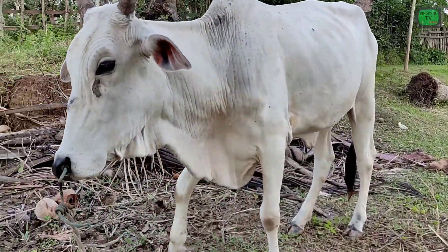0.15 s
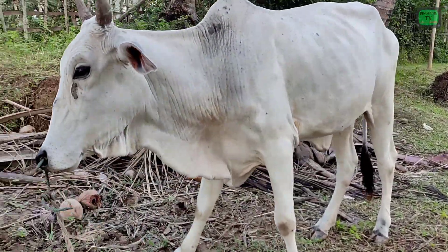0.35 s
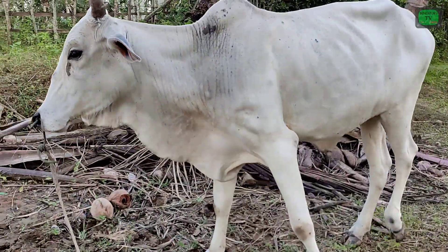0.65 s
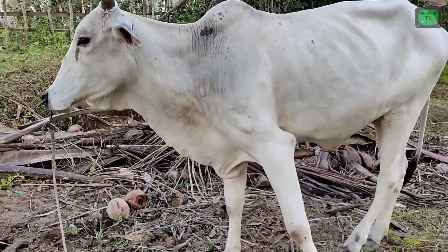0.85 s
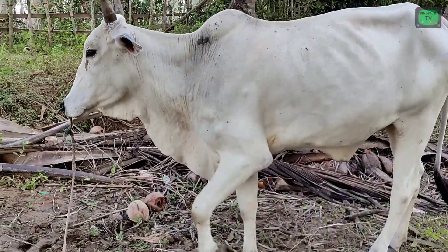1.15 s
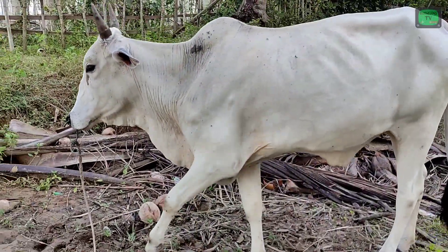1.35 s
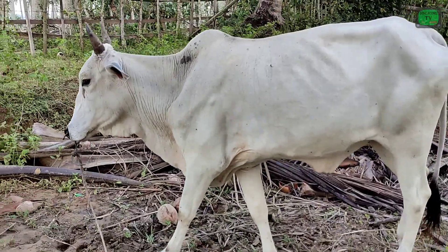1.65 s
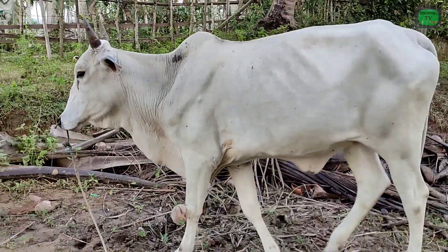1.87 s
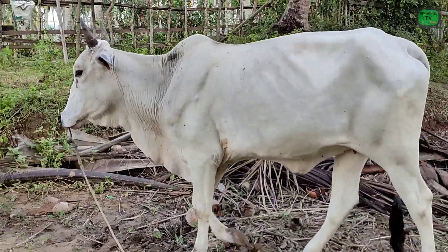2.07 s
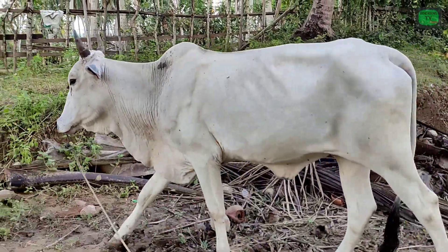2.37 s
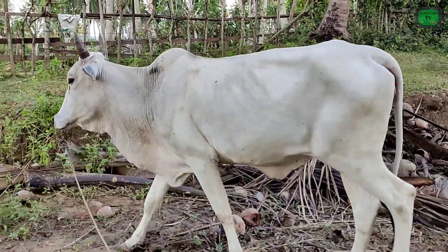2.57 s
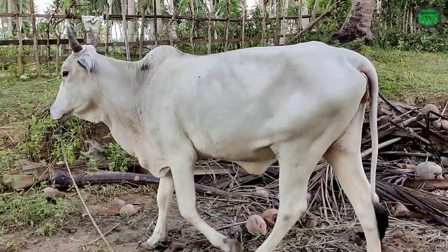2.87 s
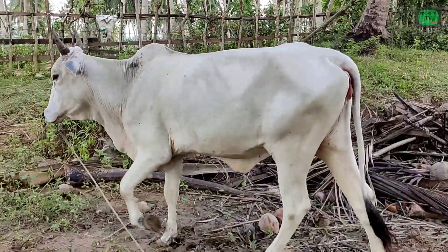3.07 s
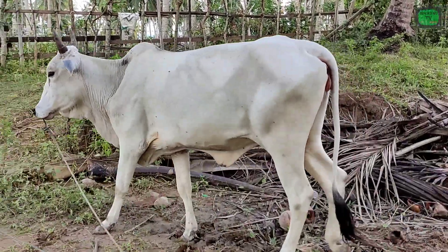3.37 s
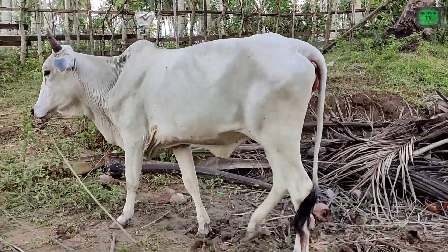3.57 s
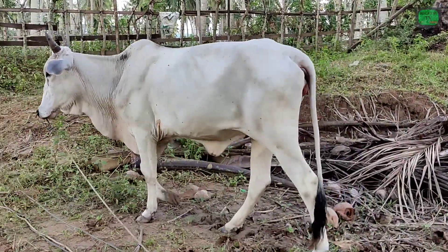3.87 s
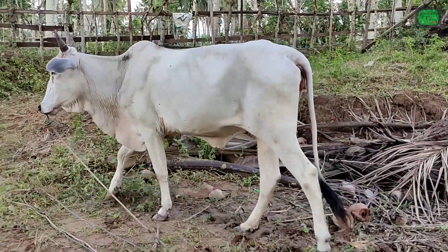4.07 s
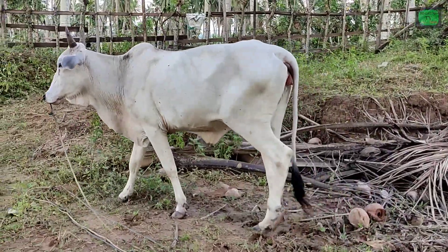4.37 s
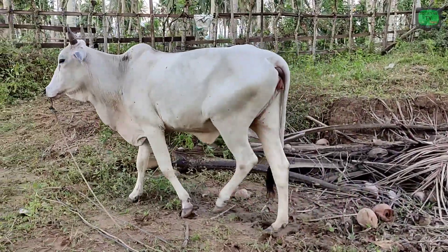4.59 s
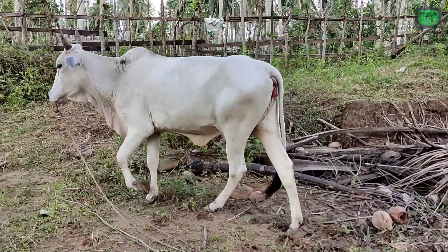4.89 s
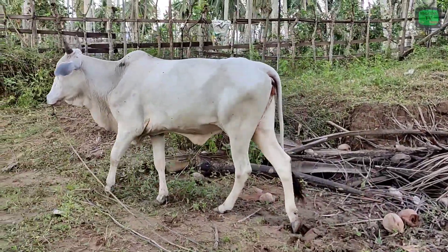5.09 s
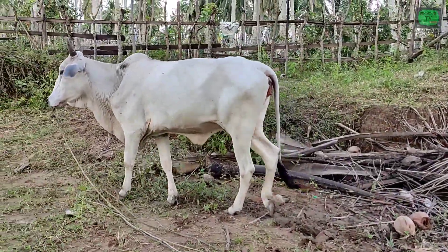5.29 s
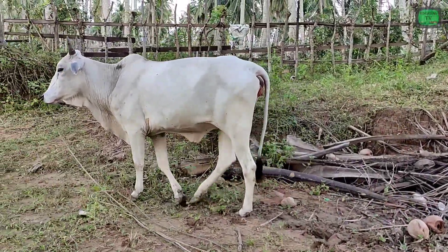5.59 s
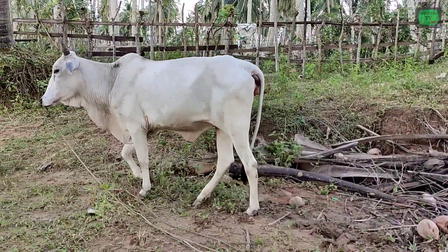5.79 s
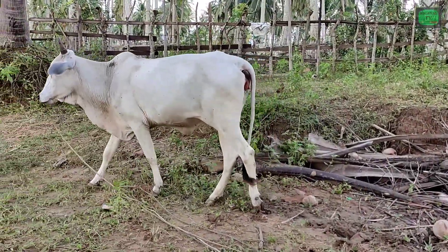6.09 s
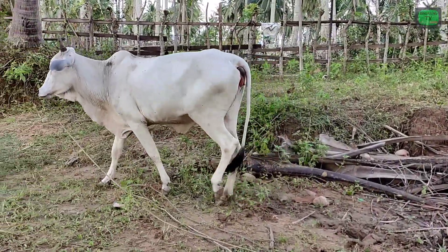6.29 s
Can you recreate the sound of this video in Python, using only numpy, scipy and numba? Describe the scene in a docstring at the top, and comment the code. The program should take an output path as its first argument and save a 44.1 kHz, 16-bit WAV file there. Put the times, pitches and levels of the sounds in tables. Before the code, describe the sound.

In a still farmyard one cow calls twice. The first moo starts slack and rattly, rises gradually to a steady bray with airy hiss, and drops quickly at the end. Small dry twigs crackle in the gap. The second moo has the same shape but is higher, stronger and more piercing, its held tone hitching slightly several times. The microphone is close, with a short diffuse outdoor tail, and the treble leans left.

```python
"""Moos in a farmyard

One moo of a cow is heard twice, the second time raised in pitch and resonances, and louder. Pulses and
turbulence from the vocal folds ring the resonances of the airway. Each moo starts behind closed lips,
opens from a slack, snapping rasp into a clear tone with a hiss on top and slackens again; a toneless
noisy tail fades after it. The held tone of the second skips by part of a cycle several times.
Fence and trees scatter the sound as dense echoes. Shaped noise makes the quiet air, and resonant
bursts of noise the few ticking twigs."""
import sys
import numpy as np
from scipy import signal
from scipy.fft import rfft, irfft, next_fast_len
from scipy.io import wavfile
from scipy.ndimage import uniform_filter1d
from numba import njit

SR = 44100
rng = np.random.default_rng(int(sys.argv[2]) if len(sys.argv) > 2 else 0)


def log_audio(samples):
    """Write samples as a 16-bit WAV file to the path given in sys.argv[1]."""
    # one column per channel
    frames = np.atleast_2d(samples).T
    # limit to full scale, then quantise
    limited = np.clip(frames, -1, 1)
    pcm = np.round(limited * 32767).astype(np.int16)
    wavfile.write(sys.argv[1], SR, pcm)


N = 283987
TIME = np.arange(N) / SR


def from_db(db):
    """Decibels express the logarithm of an amplitude ratio; this gives the ratio."""
    return 10 ** (np.asarray(db) / 20)


def rms_one(x):
    """Normalization: the root mean square becomes 1."""
    return x / np.sqrt(np.mean(x ** 2) + 1e-20)


def in_time(rows, t):
    """Linear interpolation of the columns of a curve at times t."""
    s, *columns = np.transpose(rows)
    return [np.interp(t, s, c) for c in columns]


def at_hz(points, hz):
    """Interpolation of a spectrum on a logarithmic frequency axis."""
    f, value = np.transpose(points)
    return np.interp(np.log(hz + 1), np.log(f), value)


def butter(x, hz, kind, order=2):
    """Causal filtering with a maximally flat (Butterworth) passband."""
    sections = signal.butter(order, np.minimum(hz, .45 * SR), kind, fs=SR, output="sos")
    return signal.sosfilt(sections, x + 1e-18)


@njit
def two_pole(drive, pull, damping):
    """Second-order feedback: a resonance whose tuning may change from sample to sample."""
    y = drive.copy()
    for i in range(2, len(y)):
        y[i] += pull[i] * y[i - 1] - damping * y[i - 2]
    return y


def resonate(x, hz, width_hz):
    """Resonance with a moving centre, passed twice for steep flanks; the gain at the peak is 1."""
    r = np.exp(-np.pi * width_hz / SR)
    pull = 2 * r * np.cos(2 * np.pi * hz / SR) * np.ones(len(x))
    for _ in range(2):
        two_back = np.pad(x, (2, 0))[:-2]
        x = two_pole((1 - r * r) / 2 * (x - two_back), pull, r * r)
    return x


def evened(x, size=1300):
    """Level control: dividing by the short-time rms holds it at 1."""
    power = uniform_filter1d(uniform_filter1d(x * x, size), size)
    return x / np.sqrt(np.maximum(power, 0) + 1e-14)


def delayed(x, s):
    """Pure delay: the same sound s seconds later."""
    at = np.arange(len(x))
    return np.interp(at - s * SR, at, x, left=0)


def drift(cutoff_hz, size):
    """Low-passed noise wanders at random; its spread is 1."""
    return rms_one(butter(rng.standard_normal(size + SR), cutoff_hz, "low")[SR:])


# spectrum of the background air, relative: frequency_hz, level_db (per Hz)
AIR_SPECTRUM = [(15, -73), (25, -65), (49, -8.5), (119, -9.5), (221, -11), (378, -17), (482, -24.5),
                (582, -18.5), (631, -24), (1450, -29), (2630, -33), (3630, -28), (5880, -40.5), (9050, -32),
                (15500, -52.5)]
# correlation between left and right in the air: frequency_hz, likeness (no unit)
AIR_LIKENESS = [(60, 0.96), (130, 0.91), (290, 0.69), (640, 0.16), (1410, -0.062), (3100, -0.047),
                (6820, -0.03), (15000, -0.03)]
AIR_DB = -68.5


def air():
    """Diffuse field: shaped noise, alike on both sides only in the bass."""
    hz = np.arange(N // 2 + 1) * SR / N
    mid, side = rfft(rng.standard_normal((2, N)))
    alike = np.clip(at_hz(AIR_LIKENESS, hz), -.9, .99)
    side = np.sqrt((1 - alike) / (1 + alike)) * side * [[1], [-1]]
    both = irfft(from_db(at_hz(AIR_SPECTRUM, hz)) * (mid + side), N)
    return from_db(AIR_DB) * both / np.std(both.mean(axis=0))


# twigs and dry leaves: start_s, peak_db, ring_hz, t60_s (decay by 60 dB of the burst)
TWIGS = [(0.309, -67, 900, .02), (3.80, -59, 9000, 0.34), (3.808, -60, 1390, 0.13),
         (3.892, -53, 950, 0.015), (4.044, -49.5, 720, 0.015), (4.127, -54, 1300, 0.012),
         (4.265, -57, 3540, 0.019), (4.28, -51, 3640, 0.0077)]


def twigs(width_hz=2600):
    """Damped excitation: a decaying noise burst in a broad resonance gives a short crack or rustle."""
    out, t = np.zeros((2, N)), TIME[:SR // 4]
    for start_s, peak_db, ring_hz, t60_s in TWIGS:
        bursts = rng.standard_normal((2, len(t))) * from_db(-60 * t / t60_s)
        crack = np.array([resonate(burst, ring_hz, width_hz) for burst in bursts])
        at = round(start_s * SR)
        out[:, at:at + len(t)] += from_db(peak_db) * crack / np.abs(crack).max()
    return out


def echoes(x, t60, turns_per_s):
    """Dense reflections differ on each side and glide between two patterns as the animal moves."""
    t = TIME[TIME < min(t60, 1)]
    patterns = rng.standard_normal((2, 2, SR))[..., :len(t)] * from_db(-60 * t / t60)
    patterns /= np.sqrt(np.sum(patterns * patterns, axis=2, keepdims=True))
    angle = 2 * np.pi * turns_per_s * TIME
    shares = np.cos(angle), np.sin(angle)   # constant power
    return sum(share * signal.oaconvolve(x, paths, axes=1)[:, :N]
               for share, paths in zip(shares, patterns))


# shading of the right side, strongest in the treble: frequency_hz, left_minus_right_db
SHADE = [(100, 3), (380, 3), (720, 4.5), (1000, 1), (1350, 4), (2400, 12), (4400, 1.5), (6500, 11),
         (8500, 15), (15000, 17.5)]
LEFT_SCATTER_HZ, RIGHT_SCATTER_HZ = 3400, 1300   # each side is scattered above this
SCATTER_T60_S, SCATTER_DB = .028, 2.5
TAIL_T60_S, TAIL_DB, TAIL_HZ = .24, -5, [1200, 8000]
DIRECT_HZ, RIGHT_LAG_S = 4500, .0001


def yard(x, snap):
    """Direct and scattered sound: vowel and snaps arrive straight, left first; treble is scattered.

    More is scattered on the shaded right; a short tail beats with gliding partials."""
    direct = butter(x, DIRECT_HZ, "low", order=1) + snap
    both = np.array([direct, delayed(direct, RIGHT_LAG_S)])
    treble = np.array([butter(x, hz, "high", order=3) for hz in (LEFT_SCATTER_HZ, RIGHT_SCATTER_HZ)])
    both += from_db(SCATTER_DB) * echoes(treble, t60=SCATTER_T60_S, turns_per_s=0.3078)
    tail = butter(x, TAIL_HZ, "band", order=2)[None]
    both += from_db(TAIL_DB) * echoes(tail, t60=TAIL_T60_S, turns_per_s=.1)
    size = next_fast_len(N + SR // 8, True)
    hz = np.arange(size // 2 + 1) * SR / size
    sides = from_db(at_hz(SHADE, hz) * np.array([[.5], [-.5]]))
    sides /= np.sqrt(np.mean(sides ** 2, axis=0))
    return irfft(rfft(both, size) * sides, size)[:, :N]


RELEASE_AT_S = 2.634   # age at which the voice starts to die away
MOO_END_S = 3.36   # end of the tail on the clock of the first moo
END_FADE_S = 0.015   # length of the short fade that ends the tail; the tail also enters in this time
TAIL_NOISE_HZ, TAIL_NOISE_DB, TAIL_NOISE_FADE_DB_PER_S = (250, 2800), -55.5, 56   # before the call's gain


def tail_noise(age):
    """Exponential decay: a toneless, noisy tail fades after the tone drops."""
    since = age - RELEASE_AT_S
    fade = from_db(TAIL_NOISE_DB - TAIL_NOISE_FADE_DB_PER_S * np.maximum(since, 0))
    level = np.clip(since / END_FADE_S, 0, 1) * fade
    return level * rms_one(butter(rng.standard_normal(len(age)), TAIL_NOISE_HZ, "band", order=1))


# unevenness of the folds, each as (taut, slack)
WAVER = (.001, .0045)   # spread of the beat rate, as a fraction
JITTER_S = (.000005, .00003)
SHIMMER_DB, LIMP_DB = 1.5, .8   # fully slack: spread of the pulse strength, and its strong-weak swing


def folds(pitch, slack):
    """Self-oscillation: each snap shut gives a pulse and a puff; slack folds beat unevenly, strong-weak."""
    n = len(pitch)
    waver = np.interp(slack, [0, 1], WAVER) * drift(29.6, size=n)
    cycles = np.cumsum(pitch * (1 + waver)) / SR
    at = np.interp(np.arange(int(cycles[-1])), cycles, np.arange(n))
    loose = slack[at.astype(int)]
    chance = rng.standard_normal((len(at), 2))
    at = np.clip(at + SR * np.interp(loose, [0, 1], JITTER_S) * chance[:, 0], 0, n - 2)
    limp = LIMP_DB * (-1) ** np.arange(len(at))
    strength = from_db(loose * (SHIMMER_DB * chance[:, 1] + limp))
    # each pulse is shared between two samples, so it may fall between them
    whole, part = at.astype(int), at % 1
    pulses = np.bincount(whole, strength * (1 - part), n) + np.bincount(whole + 1, strength * part, n)
    puffs = rng.standard_normal(n) * np.exp(np.cos(2 * np.pi * cycles))
    return rms_one(pulses), rms_one(puffs)


# the nasal cavity as a side branch that swallows some partials: centre_hz, width_hz (before the ratio)
ANTIRESONANCES = [(905, 120), (1760, 12)]


def side_branch(x, ratio):
    """Antiresonance: a side branch cuts a notch at each of its own frequencies."""
    for hz, width_hz in ANTIRESONANCES:
        x = signal.lfilter(*signal.iirnotch(hz * ratio, hz / width_hz, fs=SR), x)
    return x


# level of each part of the voice before the gain of the call:
# part: base_db, slack_extra_db, wide_mouth_extra_db, closed_lips_extra_db, trend_db_per_s
LEVELS = {"nose": (-33, -2, -5, -4, -0.12), "mouth": (-37.3, -4, 7.3, -10, -0.24),
          "bray": (-36.3, -4.5, -0.5, -22, -1.77), "rasp": (-32.8, -1.8, -4.5, -14, -2.2),
          "buzz": (-57, 2, 2, -18, -1), "hiss": (-53, -1, 4.5, -20, 2.5), "rush": (-53, 7, -7, -14, -5),
          "huff": (-51, 0, 1.5, -5, 1.5), "snap": (-44, 7.5, -11, -22, -1)}
# how each part enters and dies away: part: start_offset_db, settling_s, release_db_per_s
ENVELOPES = {"nose": (-9.5, 0.28, 162), "mouth": (-17, 0.34, 170), "bray": (-0.45, 0.12, 180),
             "rasp": (-4, 0.54, 530), "buzz": (2.2, 0.45, 510), "hiss": (6.6, 0.53, 450),
             "rush": (0.99, .6, 260), "huff": (-3.7, 0.29, 150), "snap": (-11.5, 0.2, 720)}
# one part swells or dips briefly, on the clock of the first moo: part, centre_s, half_length_s, gain_db
SURGES = [("rasp", 1.21, .07, 3), ("bray", 1.215, .045, 6), ("mouth", 2.75, .04, 3),
          ("bray", 2.865, .04, 5), ("nose", 3.115, .04, 3), ("hiss", 1.22, .2, -4), ("hiss", 3.17, .1, -4)]
HUM_S, PARTING_S = 0.052, 0.016   # the lips stay closed, then part


def loudness_db(group, t, slack, wide):
    """Envelope: a hum, the lips part, the level settles, follows folds and mouth, and dies away."""
    base_db, slack_db, wide_db, closed_db, trend = LEVELS[group]
    start_db, settling_s, release = ENVELOPES[group]
    age = t - t[0]
    closed = np.clip(1 - (age - HUM_S) / PARTING_S, 0, 1)
    attack = closed_db * closed + start_db * np.clip(1 - age / settling_s, 0, 1)
    hold = base_db + slack_db * slack + wide_db * wide + trend * age
    surges = sum(db * np.exp(-((t - s) / half_s) ** 2) for name, s, half_s, db in SURGES if name == group)
    return attack + hold + surges - release * np.maximum(age - RELEASE_AT_S, 0)


# course of a moo on the clock of the first one: time_s, pitch_hz (before the ratio of the call)
PITCH = [(0.52, 104.3), (0.59, 107.9), (0.89, 116.5), (1.14, 133.9), (1.21, 137.1), (1.43, 142.3),
         (1.77, 146.6), (2.27, 147.1), (2.59, 146), (2.8, 140.4), (3.02, 128.1), (3.07, 122), (3.13, 108),
         (3.22, 81.9)]
# resonances of the airway in six groups, before the ratio of the call:
# centre_hz, width_hz (of one pass), level_db, slack_extra_db, slack_shift_hz
NOSE = [(345.8, 32, -21, 32, 0.0079), (339.4, 146, 7, 1, 0.005)]
MOUTH = [(580, 20, -3.5, -1, -2), (720, 79, 2.5, -4.5, 2.5)]
BRAY = [(1156, 124, -0.5, -1, -11), (1346, 124, -2.5, 4.5, 13.5), (1548, 250, -14, 7, 5)]
RASP = [(1961, 91, 7, -4, 11), (2054, 67, 4.5, 0.5, 1), (2295, 106, 4.5, 0.5, -13.5),
        (2620, 196, -7, 10, -8), (2846, 158, -11.5, 13.5, 53), (3380, 220, -20, 15, 4),
        (3827, 280, -14.5, -15.5, 100), (4300, 310, -16.5, 0, 92)]
BUZZ = [(2840, 250, -1, 3, 0), (3713, 240, -1, -0.5, 0), (4237, 350, 0, 0, 0)]
HISS = [(5040, 1400, -16, 15, -5), (6440, 310, 3.5, 1.5, -230), (7510, 600, 2.5, 4.5, 148),
        (8170, 480, 5, -1.5, 246.5), (9470, 450, 5, -1, -200), (11440, 400, 1, 0, -500),
        (12150, 860, -3.5, -3, 299)]
# turbulence that each group gets: level_db, slack_extra_db
NOSE_NOISE = (-20, 9)
MOUTH_NOISE = (-14, 2)
BRAY_NOISE = (-12.5, 1)
RASP_NOISE = (-9, -3)
BUZZ_NOISE = (-14, 6)
HISS_NOISE = (-12.5, 12)
TAUT_HZ, SLACK_RANGE_HZ = 141.45, 32.2   # folds are taut at this pitch, fully slack this far below it
# the mouth widens and narrows again; times from the start of the moo
WIDENS_AT_S, WIDENING_S, NARROW_AT_S, NARROWING_S = 0.55, 0.85, 2.296, 0.34
FLUTTER_DB, FLUTTER_PITCH = 1.67, 0.00505   # spread at flutter 1; that of pitch is a fraction
RESONANCE_WANDER = .015   # spread as a fraction, folds fully slack
# bands of pulsed air with no tone and of the bare snap, before the ratio
RUSH_HZ, HUFF_HZ, SNAP_HZ = (3540, 6600), (500, 1300), (664, 3400)
SNAP_GAP_S, SECOND_SNAP_DB = .00298, -7   # each snap comes twice; the gap is divided by the ratio
LOWEST_HZ, HIGHEST_HZ = 210, 13100   # before the ratio


def moo(start, ratio, extra_hiss_db, extra_bray_db, flutter):
    """Source and filter: folds ring the airway while air rushes alongside; gives (voice, bare snaps).

    The ratio raises pitch and resonances alike."""
    first = CALL_ROWS[0][0]
    t = first + TIME[TIME < MOO_END_S - first]
    age = t - first
    pitch, = in_time(PITCH, t)
    slack = np.clip((TAUT_HZ - pitch) / SLACK_RANGE_HZ, 0, 1)
    widening = (age - WIDENS_AT_S) / WIDENING_S
    narrowing = (NARROW_AT_S - age) / NARROWING_S
    wide = np.clip(np.minimum(widening, narrowing), 0, 1)
    pitch = pitch * ratio * (1 + flutter * FLUTTER_PITCH * drift(73.3, size=len(t)))
    level_db = {group: loudness_db(group, t, slack, wide) for group in LEVELS}
    pulses, puffs = folds(pitch, slack)
    pulses = side_branch(pulses, ratio)
    tuning = ratio * (1 + RESONANCE_WANDER * slack * drift(10.5, size=len(t)))

    def airway(modes, noise, gain_db):
        """Modal superposition: one group of resonances at a steady level, with a quick flutter."""
        noise_db, slack_noise_db = noise
        source = pulses + from_db(noise_db + slack_noise_db * slack) * puffs
        rings = 0
        for hz, width, db, extra_db, shift in modes:
            ring = resonate(source, (hz + shift * slack) * tuning, width * ratio)
            rings = rings + from_db(db + extra_db * slack) * ring
        return from_db(gain_db + flutter * FLUTTER_DB * drift(24.0, size=len(t))) * evened(rings)

    def pulsed_air(band_hz):
        """Band-passed turbulence: puffs with no tone."""
        return rms_one(butter(puffs, np.multiply(band_hz, ratio), "band"))

    voice = from_db(level_db["nose"]) * airway(NOSE, NOSE_NOISE, gain_db=-0.13)
    voice += from_db(level_db["mouth"]) * airway(MOUTH, MOUTH_NOISE, gain_db=0.5)
    voice += from_db(level_db["bray"] + extra_bray_db) * airway(BRAY, BRAY_NOISE, gain_db=1.0)
    voice += from_db(level_db["rasp"]) * airway(RASP, RASP_NOISE, gain_db=-0.57)
    voice += from_db(level_db["buzz"] + extra_hiss_db) * airway(BUZZ, BUZZ_NOISE, gain_db=-1.0)
    voice += from_db(level_db["hiss"] + extra_hiss_db) * airway(HISS, HISS_NOISE, gain_db=2.5)
    voice += from_db(level_db["rush"] + extra_hiss_db) * pulsed_air(RUSH_HZ)
    voice += from_db(level_db["huff"]) * pulsed_air(HUFF_HZ)
    voice += tail_noise(age)
    snap = butter(pulses, np.multiply(SNAP_HZ, ratio), "band", order=2)
    snap = rms_one(snap + from_db(SECOND_SNAP_DB) * delayed(snap, SNAP_GAP_S / ratio))
    snap = from_db(level_db["snap"]) * snap
    end_fade = np.clip((MOO_END_S - t) / END_FADE_S, 0, 1)
    call = np.array([voice, snap]) * end_fade
    # the fundamental hardly leaves the muzzle
    call = butter(call, LOWEST_HZ * ratio, "high", order=5)
    call = butter(call, HIGHEST_HZ * ratio, "low", order=24)
    return np.pad(call, [(0, 0), (round(start * SR), N)])[:, :N]


# skips in the held tone of the second moo: time_s, skip_s (positive is earlier)
SKIPS = [(5.675, -.00194), (5.74, .00209), (5.897, .00204), (6.03, -.00194), (6.077, .00209),
         (6.11, .00209), (6.165, -.00199), (6.25, .00199), (6.345, .00204)]
SKIP_FADE_S = .008   # length of each crossfade


def skipping(x):
    """Phase jump: the held tone of the second moo skips by part of a cycle, earlier or later."""
    for s, skip_s in SKIPS:
        after = np.clip((TIME - s) / SKIP_FADE_S + .5, 0, 1)
        x = (1 - after) * x + after * np.roll(x, -round(skip_s * SR), axis=-1)
    return x


# the calls: start_s, ratio (of pitch and resonances), gain_db, hiss_db, bray_db, flutter (0 to 1)
CALL_ROWS = [(0.512, 1, -1, 3, -1, 0.6), (4.401, 1.336, 5.7, -3, 1.5, 0.7)]


def scene():
    """Superposition: one moo, heard twice in the yard, over the quiet background."""
    calls = sum(from_db(gain_db) * moo(start, ratio, *colour)
                for start, ratio, gain_db, *colour in CALL_ROWS)
    voice, snap = skipping(calls)
    return yard(voice, snap) + air() + twigs()


CUTOFF_HZ = 15450


def record(dry):
    """Band limiting: a steep elliptic low-pass cuts the top."""
    return signal.sosfilt(signal.ellip(10, .1, 80, CUTOFF_HZ, fs=SR, output="sos"), dry)


dry = scene()
out = record(dry)
log_audio(out)
```